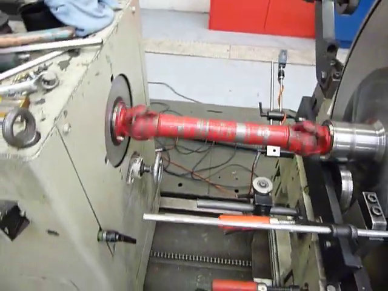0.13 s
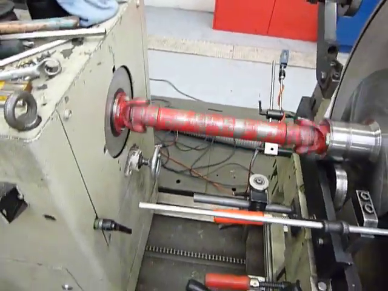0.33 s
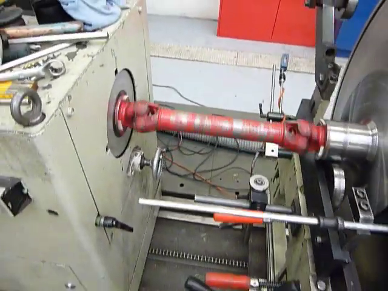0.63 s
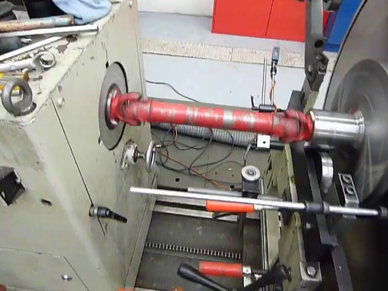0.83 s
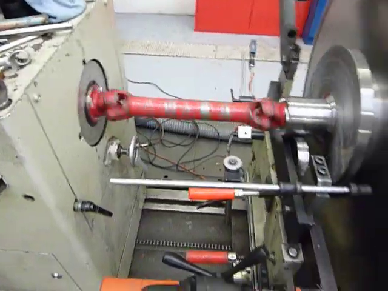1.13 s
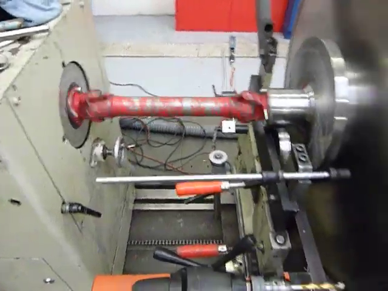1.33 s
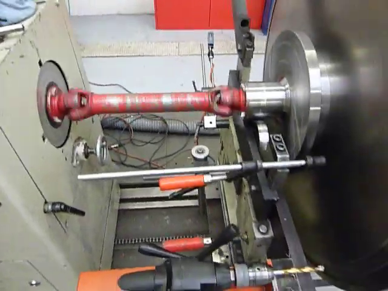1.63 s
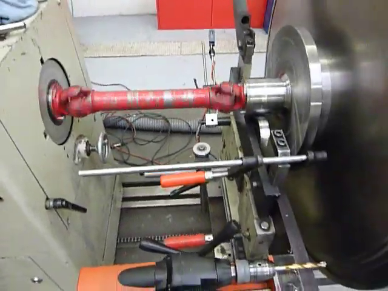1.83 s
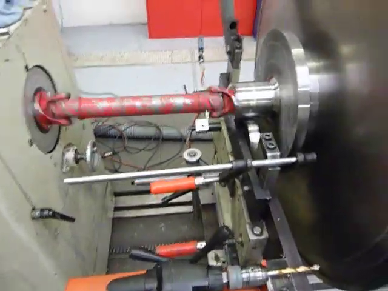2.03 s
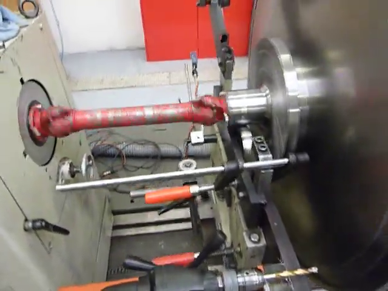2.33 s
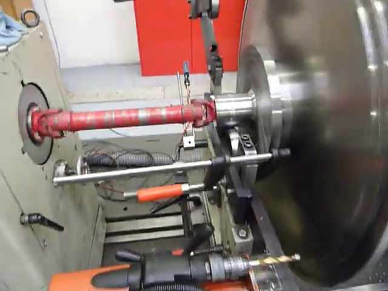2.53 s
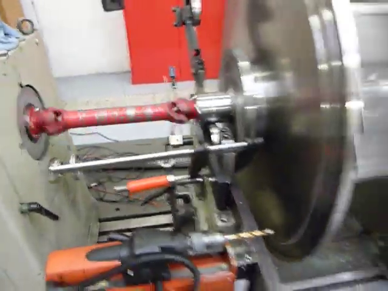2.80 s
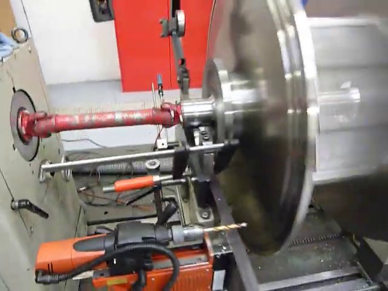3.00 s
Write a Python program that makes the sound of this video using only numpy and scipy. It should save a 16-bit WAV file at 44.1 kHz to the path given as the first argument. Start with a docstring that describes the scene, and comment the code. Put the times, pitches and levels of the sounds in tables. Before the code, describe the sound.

A large balancing machine hums and whirs steadily in a workshop, with one short metallic clack.

```python
"""A balancing machine spins a large steel rotor through a cardan shaft in a workshop; the camera moves along it.
From the start: coloured noise for bearings and air, sines on multiples of 300 Hz for the motor, thin whines,
and a drone of narrow noise resonances led by the lowest. At 0.85 s decaying sines and a noise burst make
one short metallic clack. The lead passes to the middle resonance near 1 s and the highest near 2.2 s;
the drone drops after 2.7 s. The bearings sing loudest near 0.8 and 2.3 s."""
import sys
import numpy as np
from scipy.fft import rfft, irfft, next_fast_len
from scipy.io import wavfile
from scipy.ndimage import map_coordinates

SR = 44100
rng = np.random.default_rng(int(sys.argv[2]) if len(sys.argv) > 2 else 0)


def wrap_up_sound(samples):
    """Save the sound to the file named by the first command line argument, as 16-bit audio."""
    columns = np.atleast_2d(samples).T
    # keep every value between -1 and 1, then stretch to whole-number steps
    tamed = np.clip(columns, -1, 1)
    steps = np.round(tamed * 32767).astype(np.int16)
    wavfile.write(sys.argv[1], SR, steps)


N = 139356

# Rush of bearings and air, relative spectrum. Each row: frequency in Hz, density in dB per Hz.
RUSH_SPECTRUM = [(20, -44.5), (38, -30), (52, -20), (70, -21.5), (90, -6), (120, -5), (165, -6.5),
                 (215, -0.5), (320, 3.5), (400, 1.5), (490, 0), (590, -5), (650, -6.5), (700, -3.5),
                 (810, -5), (880, -7), (1100, -9), (1300, -11), (1900, -11.5), (2300, -10.5), (2650, -17),
                 (3300, -20.5), (4200, -22), (5000, -25.5), (6000, -27), (6700, -28.5), (7500, -31.5)]
# Level of the rush. Each row: time in seconds, level in dB.
RUSH_LEVEL = [(0, -28.5), (1.5, -28.5), (2.5, -28.5), (3.16, -29)]
# Extra gain on the treble of the rush. Each row: time in seconds, gain in dB.
HISS_GAIN = [(0, 0), (.9, 1), (1.7, -0.5), (2.2, 0.6), (2.8, -0.5), (3.16, 0)]
HISS_FROM_HZ = 1100

# Singing of the bearings. Each row: centre in Hz, half-width in Hz, rms in dB before SINGING_GAIN.
SINGING = [(2210, 17, -46), (4880, 15, -62), (5703, 15, -62)]
# Swell of the singing. Each row: time in seconds, gain in dB.
SINGING_GAIN = [(0, -8), (.8, 5.5), (1.5, 1.5), (1.85, 3.5), (2.3, 6), (2.7, -11.5), (3.16, -6)]

# Rattle of the clack, relative spectrum. Each row: frequency in Hz, density in dB per Hz.
RATTLE_SPECTRUM = [(700, -36), (1500, -18), (2000, -3.5), (2500, -0.5), (2900, 0), (3300, -2.5), (3900, -5),
                   (4600, -10), (6000, -13.5), (7500, -21.5)]
RATTLE_START_S, RATTLE_DB = .8535, -27.5  # level before the envelope
RATTLE_ATTACK_S, RATTLE_HOLD_S, RATTLE_T60_S = .004, 0.012, .11
# Contacts of the clack. Each row: start in seconds, level in dB.
CONTACTS = [(.8555, -28.5), (.8615, -25), (.8675, -30.5), (.879, -34)]
# Modes of the struck steel. Each row: frequency in Hz, level in dB relative to the contact, T60 in seconds.
STEEL_MODES = [(1860, -7.5, .17), (2190, -9.5, 0.12), (2770, -4, 0.1), (3150, -10, 0.083),
               (3607, -9, 0.078), (3950, -14.5, .1), (6020, -22, .08), (7120, -20.5, .08)]

BUZZ_HZ = 300.07
# Motor buzz. Each entry: multiple of BUZZ_HZ, rms in dB.
BUZZ = {1: -33.5, 3: -42.5, 4: -53, 5: -50, 6: -52, 7: -47.5, 8: -47, 10: -56, 11: -56.5, 12: -60, 14: -56,
        15: -56.5, 16: -58, 19: -74, 20: -68.5, 21: -68.5, 22: -61.5, 23: -68, 24: -66, 25: -71, 26: -69.5}
# Thin whines. Each row: frequency in Hz, rms in dB.
WHINES = [(100, -57.5), (1615, -51.5), (2541, -58), (4402, -67.5), (4602, -72.5)]
# Random waver of each tone: depths at a wobble of 1, rates in knots per second
LOW_WAVER_DB, TREBLE_WAVER_DB, WAVER_PER_S = 0.5, 2, 3
MID_DRIFT_RAD, SIDE_DRIFT_RAD, DRIFT_PER_S = 0.46, 2, 2.5

# Weaker frame resonances. Each row: centre in Hz, half-width in Hz, rms in dB.
FRAME = [(120.2, 9.2, -46.5), (145.3, 7, -45), (181.4, 5.6, -45), (349.7, 8.7, -38), (430, 11, -40.5),
         (735, 28, -44), (787.5, 7, -44.5), (902, 20, -47), (1049, 26, -45), (2180, 6, -53)]
# Drone resonances. Each row: centre in Hz, half-width in Hz, gain in dB on DRONE_LEVELS, steadiness 0-1.
DRONE = [(233, 7, -.2, 0.4), (290.3, 6, 0.33, .7), (398.3, 1.6, 0, 0.99)]
# Drone levels at the camera before the gains in DRONE. Each row: time in seconds, low, middle, high in dB.
DRONE_LEVELS = [(0, -27, -34, -38), (0.2, -29, -35.5, -39), (0.38, -25.5, -35.5, -43.5),
                (0.6, -33.5, -39, -42), (0.8, -26, -35, -36), (1.0, -32.5, -29, -36), (1.2, -29, -29, -33),
                (1.5, -32.5, -27, -32), (1.75, -33, -31, -33.5), (2.0, -33, -26, -28),
                (2.2, -36, -29.5, -26.5), (2.45, -33.5, -26, -25), (2.68, -33.5, -29.5, -24),
                (2.85, -37, -32, -39), (3.15, -33.5, -31.5, -47)]

# Stereo lean before its fade in the bass. Each row: frequency in Hz, left minus right in dB.
LEAN = [(600, -2.1), (1100, -0.5), (1800, -0.3), (2500, 0), (2900, 1), (4500, 3.3), (6000, 2.8), (7500, 1)]
LEAN_HALVED_HZ = 540
# Stereo width. Each row: frequency in Hz, side relative to mid in dB.
WIDTH = [(120, -57), (280, -44), (400, -31), (520, -27.5), (1000, -18), (2000, -8.5), (4000, -4.5),
         (7000, -2)]
# Treble roll-off of the camera. Each row: frequency in Hz, gain in dB.
ROLL_OFF = [(7500, 0), (7780, -12), (7900, -12.5), (8400, -13.5), (8700, -22)]
TOP_HZ = 8750
NOTCH_HZ, NOTCH_HALF_WIDTH_HZ = 5410, 170


def amp(db):
    """Decibels to gain."""
    return 10 ** (np.asarray(db) / 20)


def unit(x):
    """Scale to rms 1."""
    return x / np.sqrt(np.mean(x ** 2) + 1e-20)


def along(points, hz):
    """Interpolate (Hz, value) points on a log axis."""
    f, v = np.transpose(points)
    return np.interp(np.log(hz + 1), np.log(f + 1), v)


def curves(rows):
    """One value per sample for each column after the time."""
    s, *columns = np.transpose(rows)
    return [np.interp(np.arange(N) / SR, s, column) for column in columns]


def wobble(knots_per_s):
    """A smooth random curve through normally distributed knots."""
    position = np.arange(N) * knots_per_s / SR
    return map_coordinates(rng.standard_normal(256), [position], mode="mirror")


def filtered(x, response):
    """x through a zero-phase gain given as a function of frequency."""
    m = next_fast_len(N + SR // 2)
    return irfft(rfft(x, m) * response(np.fft.rfftfreq(m, 1 / SR)), m)[..., :N]


def spread(hz):
    """Power-preserving gains of mid and side at a frequency."""
    side = amp(along(WIDTH, hz))
    return np.array([np.ones_like(side), side]) / np.hypot(1, side)


def stereo(mid, side):
    """Left and right with a joint rms of 1."""
    return unit(np.array([mid + side, mid - side]))


def noise(spectrum):
    """Coloured stereo noise of rms 1."""
    white = rng.standard_normal((2, N))
    return stereo(*filtered(white, lambda hz: amp(along(spectrum, hz)) * spread(hz)))


def resonance(hz, half_width_hz, steadiness):
    """Noise in a narrow band; dividing by its envelope evens out the swells."""
    f = np.fft.fftfreq(N, 1 / SR)
    band = 1 / (1 + ((f - hz) / half_width_hz) ** 2)
    ring = np.fft.ifft(np.fft.fft(rng.standard_normal((2, N))) * band)
    envelope = unit(np.abs(ring))
    ring = ring.real / (envelope ** 2 + 0.024) ** (np.clip(steadiness, 0, 1) / 2)
    return stereo(*(ring * spread(hz)[:, None]))


def tone(hz):
    """A sine whose level and phase waver as the camera moves through the room's standing waves."""
    waver_db = np.interp(hz, [900, 3000], [LOW_WAVER_DB, TREBLE_WAVER_DB])
    phase = 2 * np.pi * hz * np.arange(N) / SR
    pair = []
    for drift_rad in (MID_DRIFT_RAD, SIDE_DRIFT_RAD):
        level = amp(waver_db * wobble(WAVER_PER_S))
        offset = rng.uniform(0, 2 * np.pi) + drift_rad * wobble(DRIFT_PER_S)
        pair.append(unit(level * np.sin(phase + offset)))
    return stereo(*(np.array(pair) * spread(hz)[:, None]))


def rush():
    """Broad noise of bearings and stirred air; its treble shifts as the camera moves."""
    air = noise(RUSH_SPECTRUM)
    hiss = filtered(air, lambda hz: 1 - 1 / (1 + (hz / HISS_FROM_HZ) ** 2))
    hiss_gain = amp(curves(HISS_GAIN)[0])
    return amp(curves(RUSH_LEVEL)[0]) * (air + (hiss_gain - 1) * hiss)


def bearings():
    """Narrow high resonances that swell and fade as the camera moves."""
    singing = sum(amp(db) * resonance(hz, half_width, steadiness=.5) for hz, half_width, db in SINGING)
    return amp(curves(SINGING_GAIN)[0]) * singing


def clack():
    """A few quick contacts ring steel modes over a noisy rattle that dies away in the workshop."""
    now = np.arange(N) / SR
    t = now - RATTLE_START_S
    attack = np.clip(t / RATTLE_ATTACK_S, 0, 1)
    decay = amp(-60 * np.maximum(t - RATTLE_HOLD_S, 0) / RATTLE_T60_S)
    out = amp(RATTLE_DB) * attack * decay * noise(RATTLE_SPECTRUM)
    age = now[:SR // 3]
    for start_s, contact_db in CONTACTS:
        start = round(start_s * SR)
        for hz, mode_db, t60_s in STEEL_MODES:
            # common random phase plus a small offset per channel
            phase = rng.uniform(0, 2 * np.pi) + .5 * rng.standard_normal((2, 1))
            envelope = amp(contact_db + mode_db - 60 * age / t60_s)
            out[:, start:start + len(age)] += envelope * np.sin(2 * np.pi * hz * age + phase)
    return out


def motor():
    """Electric buzz of the drive on multiples of one frequency, and its thin whines."""
    buzz = sum(amp(db) * tone(k * BUZZ_HZ) for k, db in BUZZ.items())
    whines = sum(amp(db) * tone(hz) for hz, db in WHINES)
    return buzz + whines


def drone():
    """Three strong resonances swell and fade over the weaker ones of the frame."""
    out = sum(amp(db) * resonance(hz, half_width, steadiness=.3) for hz, half_width, db in FRAME)
    for (hz, half_width, gain_db, steadiness), level_db in zip(DRONE, curves(DRONE_LEVELS)):
        out = out + amp(level_db + gain_db) * resonance(hz, half_width, steadiness)
    return out


def scene():
    """All sources; the lean fades out in the bass, and the treble leans left."""
    def lean_gains(hz):
        lean_db = along(LEAN, hz) * hz ** 4 / (hz ** 4 + LEAN_HALVED_HZ ** 4)
        return amp(np.outer([.5, -.5], lean_db))

    return filtered(rush() + bearings() + clack() + motor() + drone(), lean_gains)


def record(dry):
    """The camera has one narrow notch, a treble roll-off and a sharp upper limit."""
    def response(hz):
        offset_hz = hz - NOTCH_HZ
        notch = np.abs(offset_hz) / np.hypot(offset_hz, NOTCH_HALF_WIDTH_HZ)
        return notch * amp(along(ROLL_OFF, hz)) * (hz < TOP_HZ)

    return filtered(dry, response)


dry = scene()
out = record(dry)
wrap_up_sound(out)
```